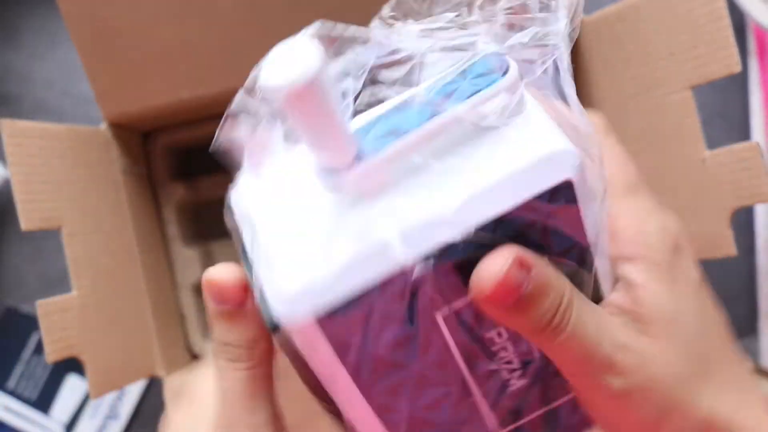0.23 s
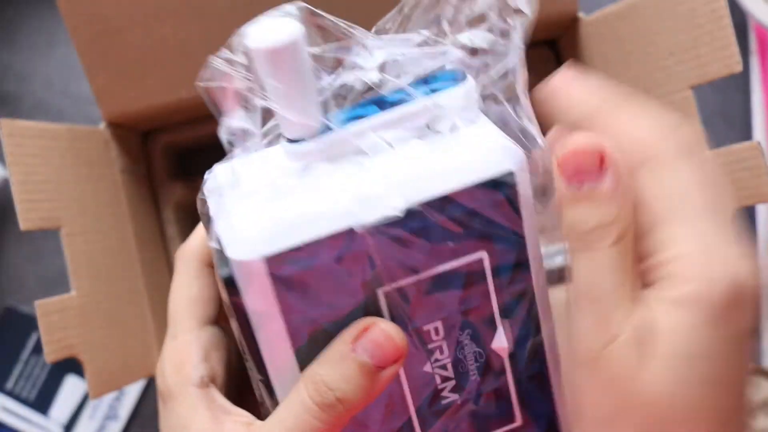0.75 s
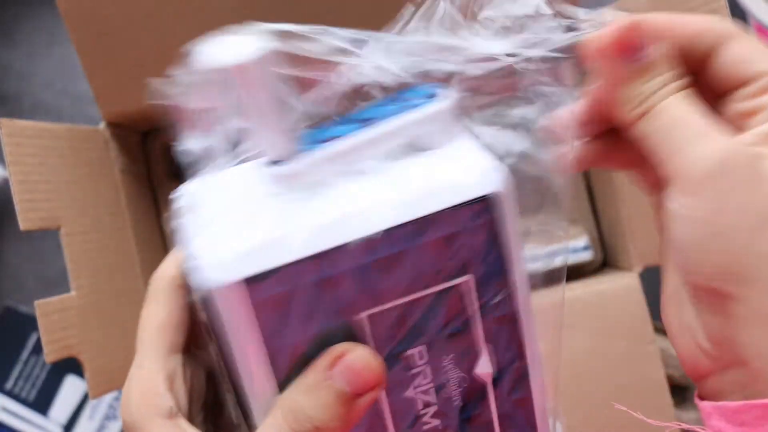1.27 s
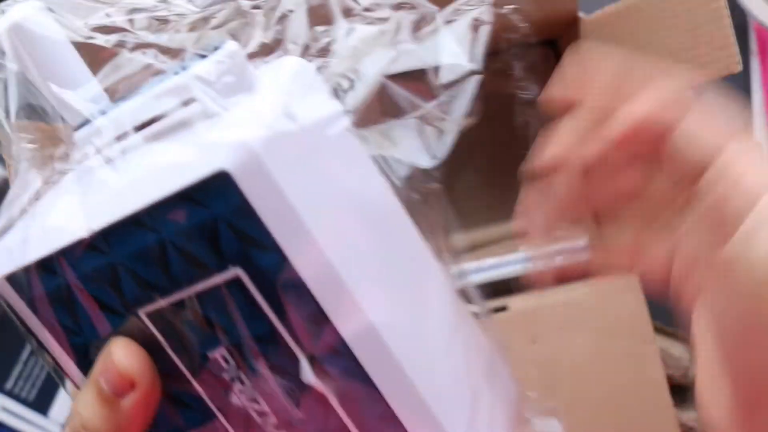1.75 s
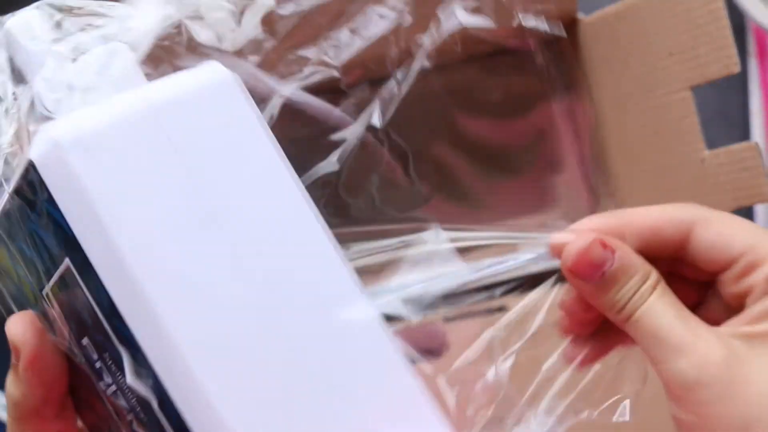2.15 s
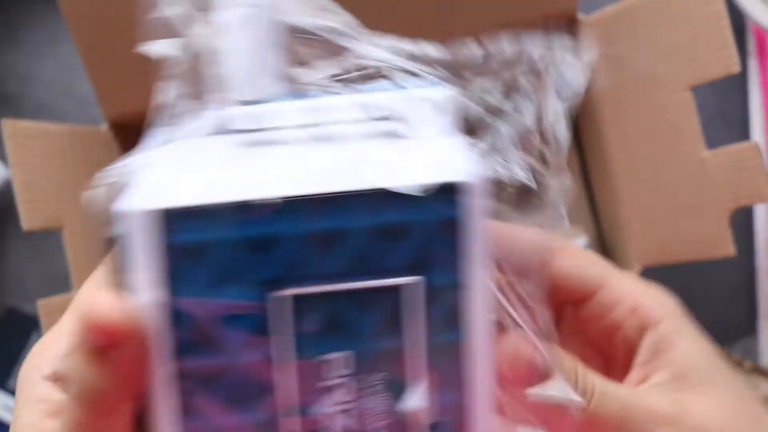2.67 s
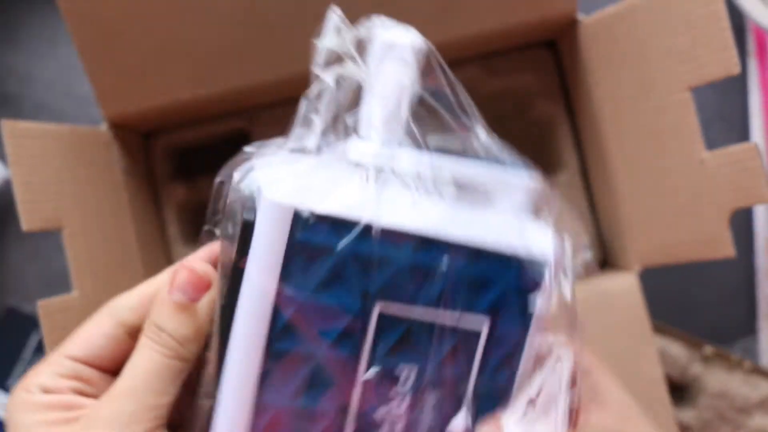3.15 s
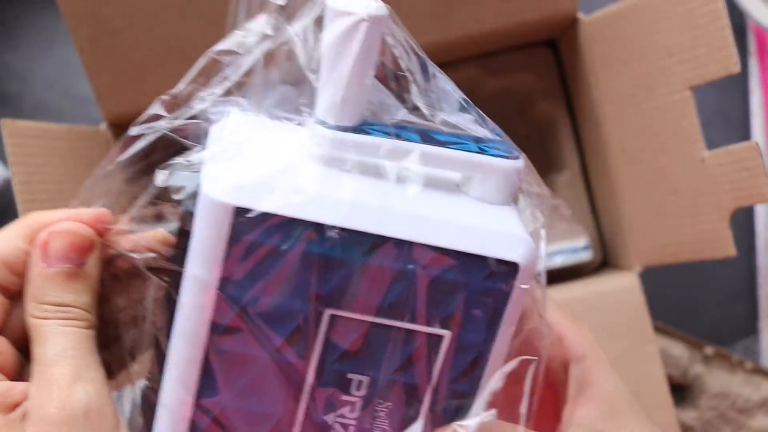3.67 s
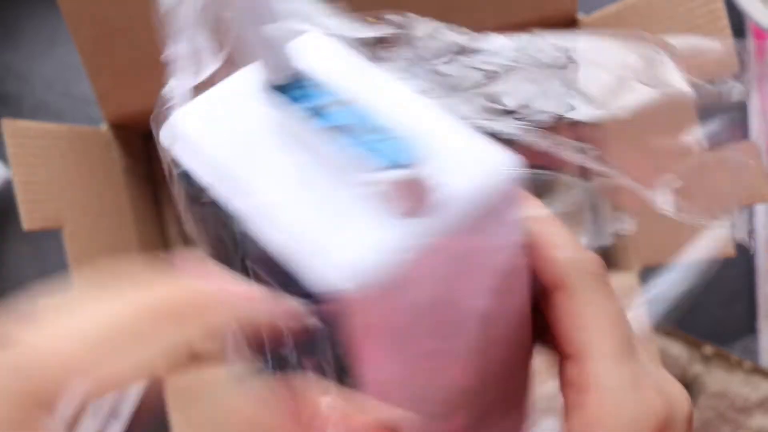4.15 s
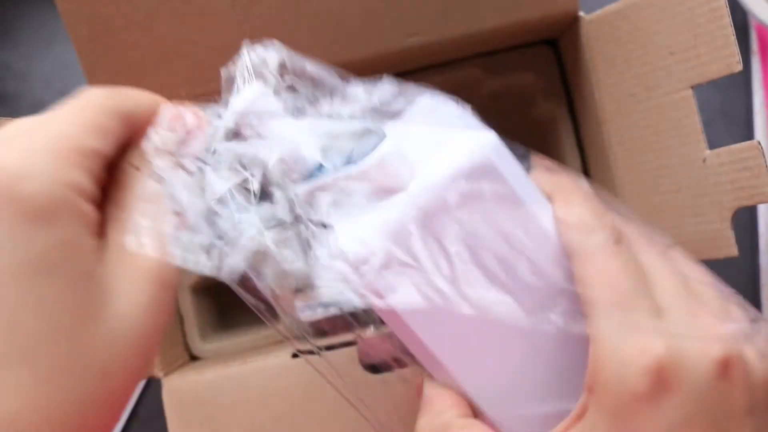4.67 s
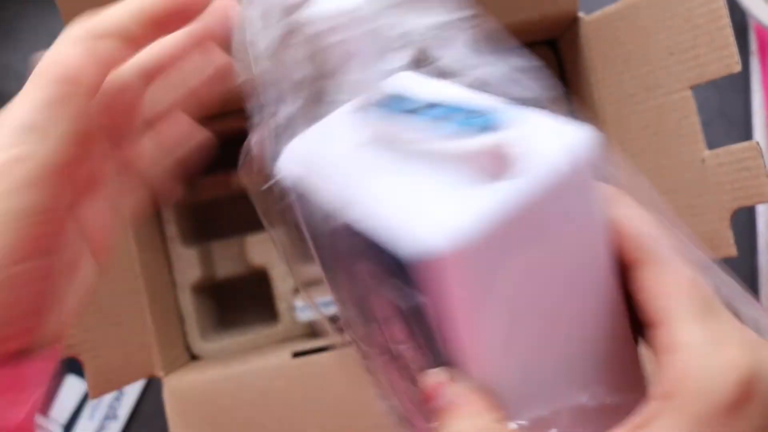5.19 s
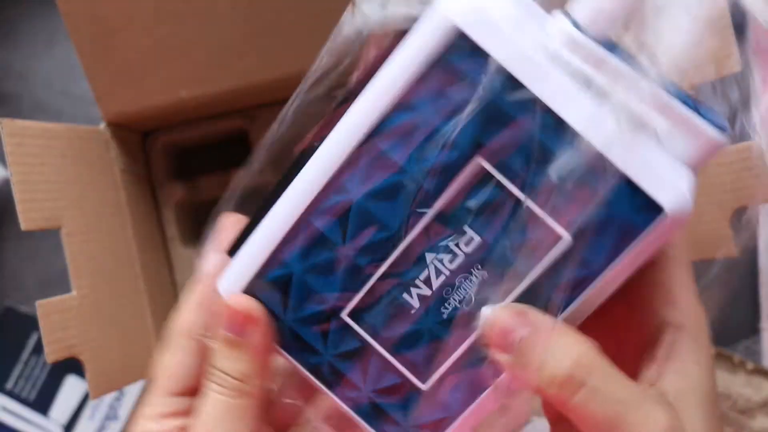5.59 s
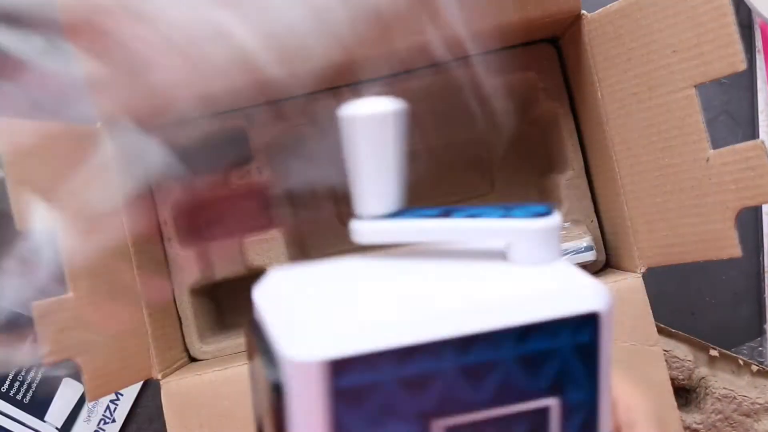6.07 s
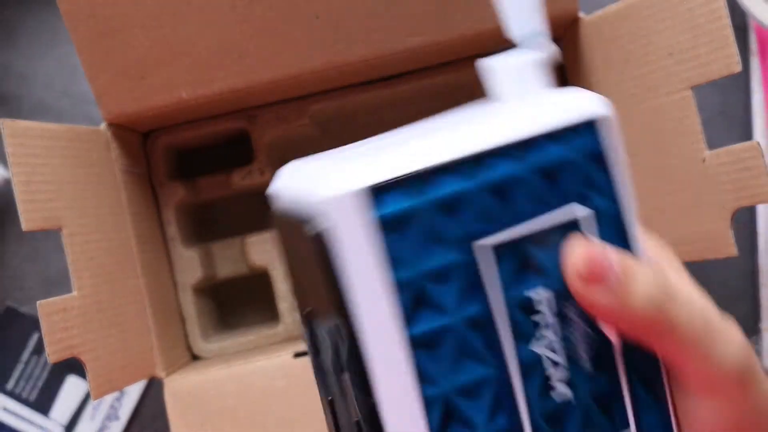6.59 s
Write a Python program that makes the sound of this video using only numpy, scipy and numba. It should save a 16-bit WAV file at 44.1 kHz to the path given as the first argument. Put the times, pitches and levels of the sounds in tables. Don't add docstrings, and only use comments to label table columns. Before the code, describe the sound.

Very close, bright plastic crinkling in a small indoor room. Tiny dry crackles run throughout in uneven surges, with hard pops and snaps on top and occasional low hollow knocks as hands turn the wrapped plastic case. Short reflections come off the carton flaps, with faint handling rumble below. Activity eases in the last second.

```python
import sys
import numpy as np
from scipy import signal
from scipy.fft import rfft, irfft, next_fast_len
from scipy.io import wavfile
from scipy.ndimage import uniform_filter1d
from numba import njit

SR = 44100
rng = np.random.default_rng(int(sys.argv[2]) if len(sys.argv) > 2 else 0)


def generate_wav(sig):
    pcm = np.round(np.clip(np.atleast_2d(sig).T, -1, 1) * 32767).astype(np.int16)
    wavfile.write(sys.argv[1], SR, pcm)


def invert_db(level):
    return 10 ** (np.asarray(level, dtype=float) / 20)


N = 301325

# (time [s], facet crackle level [dB], wide folds re facets [dB], fine ridges re facets [dB])
HAND_EFFORT = [(0.0, -31, -2, -2), (0.02, -31, -2.5, 0), (0.32, -38.5, 3.5, 2), (0.36, -46.5, -22, -11),
               (0.42, -26.5, 5, -3.5), (0.44, -37.5, -5, -2), (0.68, -28.5, 4.5, -1), (0.74, -38.5, 5, -4),
               (0.84, -39.5, 0, 12), (0.91, -44.5, -14, -16), (1.01, -26, 0.5, -0.5), (1.23, -29, -2, -7.5),
               (1.27, -35.5, -19, -2), (1.33, -28.5, 3.5, -4), (1.52, -26, 2.5, -6.5),
               (1.56, -39.5, 1.5, -7), (1.71, -27, 0, -1), (1.82, -49.5, -10, -7), (1.84, -46, 15, 3),
               (1.92, -45, -12, -12), (1.94, -36, 10.5, 4), (2.0, -34.5, 0, -3), (2.09, -31, 12.5, 6.5),
               (2.19, -34, -0.5, -17), (2.36, -39, 9.5, -1.5), (2.43, -50, 5, -9.5), (2.61, -37, 6, 4.5),
               (2.7, -38, -1, -10.5), (2.76, -28.5, -0.5, 2.5), (2.95, -34.5, -8, -4),
               (3.35, -29.5, -3.5, -4), (3.69, -35, -9, -1.5), (3.75, -50.5, -1, -30),
               (3.82, -26, -3.5, -2.5), (3.99, -34, -0.5, -8.5), (4.07, -26.5, 4, 4.5),
               (4.11, -40.5, -2, -4), (4.32, -41.5, 3, -9), (4.34, -36.5, 7.5, 1.5), (4.47, -33, -8, -9),
               (4.62, -27, 1.5, 3.5), (4.73, -27.5, -4, -11), (4.94, -25, -2, -3), (5.02, -34.5, -10, -8),
               (5.08, -32, -7, 0.5), (5.14, -39, -11, -8), (5.19, -28, -3, -3.5), (5.4, -35, -7, -18),
               (5.54, -30.5, -1, 3), (5.57, -38.5, -10, -8), (5.71, -24, 2, -2), (5.86, -34.5, -11, -5.5),
               (5.88, -26, 0.5, -1), (6.13, -31.5, 4, -5.5), (6.18, -41.5, 6.5, -10), (6.39, -40, -11, -5),
               (6.56, -34, 8.5, -4), (6.66, -51, 4, -4), (6.72, -39, 6.5, -7), (6.83, -50.5, 10, -3)]
# (time [s], peak level [dB], facet pitch [Hz], ridge tick re peak [dB])
LARGE_SNAPS = [(0.1541, -30, 5380.0, -8.0), (0.1832, -12, 5040.0, 1.0), (0.2059, -11, 4450, -15),
               (0.215, -15, 5300.0, 0.0), (0.2412, -10, 4080, 0), (0.281, -23.0, 2650.0, -12.0),
               (0.2967, -16.5, 4930, 6), (0.3164, -14, 5250.0, -9.0), (0.3525, -25, 1720.0, -11.0),
               (0.3698, -29.0, 5040.0, -4.0), (0.3793, -26.0, 6480.0, -1.0), (0.3964, -27, 1770.0, -20.0),
               (0.4801, -19, 5320.0, -6.0), (0.5076, -24, 2610.0, -6.0), (0.5254, -15.5, 5170.0, 7),
               (0.5656, -17.0, 2450.0, -10.0), (0.5719, -10.0, 4340, -21.0), (0.5844, -8, 4390.0, -12.0),
               (0.6164, -13, 2430.0, -14.0), (0.6283, -17, 1720.0, -3.0), (0.6739, -17, 2300.0, -17.0),
               (0.6852, -11, 2430.0, -11), (0.6955, -12, 3480, 11), (0.7521, -24, 5490.0, -12.0),
               (0.7823, -11, 2650.0, -4), (0.8117, -16, 2430.0, -10.0), (0.8285, -12, 3320.0, -4),
               (0.8621, -13, 4350, -15.0), (0.8894, -32, 6630.0, -4.0), (0.9124, -28, 1620, -20.0),
               (0.9382, -29, 3080.0, -6.0), (0.9517, -20.5, 2610.0, -12.0), (0.9874, -9, 2290, -6.0),
               (1.0465, -13, 2580.0, -13.0), (1.0843, -8, 2540.0, -14.0), (1.1235, -14, 2110.0, -20.0),
               (1.1843, -11, 2650.0, -6), (1.2136, -12, 2520.0, -16.0), (1.2447, -6.5, 2480.0, -22.0),
               (1.3276, -10, 2480.0, -11.0), (1.3367, -13, 2430.0, -19.0), (1.3469, -1.5, 2180, -10),
               (1.459, -16.0, 2000.0, -7.0), (1.4693, -10, 2450.0, -7), (1.4971, -7.0, 1920.0, -16.0),
               (1.589, -25.0, 1810.0, -5), (1.6103, -22, 1890.0, -8), (1.638, -21, 1770.0, -16.0),
               (1.7687, -13.5, 1960, -12.0), (1.7896, -24, 2540.0, -15.0), (1.8386, -19, 2520.0, -22.0),
               (1.8563, -35, 2860.0, -8.0), (1.8798, -15, 2520.0, -14), (1.933, -23.0, 1210.0, -16.0),
               (1.9503, -7.5, 2490, -21), (1.9748, -15, 6200.0, -4.0), (1.9999, -19, 3450.0, -4.0),
               (2.0121, -19.0, 3750.0, -9.0), (2.0211, -11, 2450.0, -12.0), (2.0505, -19, 2370.0, -13),
               (2.0733, -3.0, 2170, -18), (2.088, -5.5, 1850, -7.0), (2.1036, -3.5, 2910.0, -19.0),
               (2.1097, -6, 2540, -12.0), (2.2256, -28, 2540.0, -23.0), (2.2418, -21, 2220.0, -8.0),
               (2.2979, -12.5, 2910.0, -3), (2.3355, -23, 1210.0, -18.0), (2.3541, -18, 1770.0, -7.0),
               (2.3928, -20, 4800.0, -12.0), (2.4395, -35.0, 2000.0, -28.0), (2.4474, -36, 2780.0, -12.0),
               (2.4556, -31.0, 4180.0, 2), (2.4876, -34, 1930, -17.0), (2.5224, -30.0, 2090.0, -12.0),
               (2.5473, -21, 4290.0, -13.0), (2.558, -15, 4760, -9.0), (2.5781, -35, 1790.0, -1),
               (2.5976, -15, 1610.0, -17.0), (2.6072, -18, 1900, -2.0), (2.6227, -13, 3140, -10),
               (2.6359, -11.5, 4960, -9.0), (2.6558, -16, 3220, 2), (2.7156, -18, 2110.0, -8.0),
               (2.7313, -10, 5250.0, -6.0), (2.7435, -27, 2500.0, -6.0), (2.7502, -21, 2860.0, -16.0),
               (2.7553, -9, 5530.0, -4.0), (2.8016, -4, 2800.0, -15.0), (2.8139, -5.5, 2760.0, -22.0),
               (2.8515, -27, 2970.0, -0.0), (2.8913, -14, 1840, -1), (2.9195, -26, 2690.0, -9),
               (2.9441, -18, 5660.0, -3.0), (2.9533, -19, 1980.0, -19.0), (3.0002, -22, 2090.0, -15.0),
               (3.0439, -16, 3470.0, -7.0), (3.1058, -5, 1680.0, -3.0), (3.1811, -14, 2840.0, -9.0),
               (3.1961, -12.0, 1850.0, -12.0), (3.2085, -10.5, 5530.0, -11), (3.2248, -13, 5430.0, -14.0),
               (3.2416, -13, 2520.0, -15.0), (3.2534, -7.5, 1200, -9), (3.2966, -26, 2780.0, -6.0),
               (3.3175, -23, 1870.0, -9.0), (3.3451, -16.0, 5880.0, -7.0), (3.3733, -20.0, 1590.0, -18.0),
               (3.391, -7, 5860.0, -13.0),
               (3.4059, -2, 5730.0, -11.0), (3.4364, -8, 1920.0, -8), (3.4773, -17, 5320.0, -5.0),
              (3.4973, -9.5, 1690, -12.0), (3.555, -22, 3340.0, -8.0), (3.5702, -19.0, 3080.0, -9.0),
              (3.6455, -18.0, 1670, -8.0), (3.6686, -15.5, 1200, -6), (3.693, -21, 1770.0, -11.0),
              (3.745, -33.0, 2430.0, -19.0), (3.7567, -17.5, 1680, -26.0), (3.781, -22.0, 2300.0, -15.0),
              (3.7928, -12, 1880, -34.0), (3.807, -17, 1590.0, -15.0), (3.823, -7.5, 1850.0, -17.0),
              (3.8577, -13, 1790.0, -21.0), (3.8653, -5, 5500, -14.0), (3.9161, -9, 3470.0, -12.0),
              (3.9395, -12, 5040.0, -7.0), (3.959, -24, 4930.0, -14.0), (3.9776, -21.0, 4090.0, 5),
              (4.0223, -12, 1850.0, -10.0), (4.05, -6, 5050, -9.0), (4.111, -25, 2000.0, -14.0),
              (4.121, -19, 5190.0, 0), (4.1527, -11, 1910, -16.0), (4.2177, -16, 2640, -23.0),
              (4.2567, -12, 3470.0, -10.0), (4.316, -28, 2910.0, -28.0), (4.3346, -11.5, 3620, -7.0),
              (4.3673, -25, 2930.0, -10), (4.3771, -23, 4820.0, -16.0), (4.3954, -27, 3770.0, -18.0),
              (4.4052, -15, 5170.0, 7), (4.4327, -14, 5320.0, -12.0), (4.4637, -25, 1290.0, -10.0),
              (4.4949, -26, 1920.0, -11.0), (4.522, -7, 5340.0, -5.0), (4.5714, -19, 3700.0, -9),
              (4.581, -11.5, 2170.0, -14.0), (4.6254, -11, 3250.0, -8), (4.6346, -6.0, 3330, -15),
              (4.7461, -6, 1810.0, -17.0), (4.813, -9.0, 1790.0, -11), (4.8273, -14, 2370.0, -14.0),
              (4.9028, -7.5, 1960.0, -7.0), (4.9424, -13, 1870.0, -13.0), (5.0313, -23, 3530.0, -10.0),
              (5.0685, -16.5, 2200.0, -5.0), (5.1564, -15, 2090.0, -8), (5.1856, -14, 4690.0, -9.0),
              (5.2217, -13, 2350.0, -11.0), (5.252, -13.5, 1700, 0), (5.3167, -26, 4950.0, 4.0),
              (5.3316, -17, 1680.0, -11.0), (5.3626, -15, 1700.0, -10.0), (5.3917, -20, 1700.0, -11),
              (5.4341, -17, 1740.0, -20.0), (5.4543, -12, 6010.0, -10.0), (5.4612, -6.5, 1640, -17.0),
              (5.5413, -14, 4760, -12), (5.5966, -19, 1250.0, -10), (5.6458, -10, 2520.0, -20.0),
              (5.676, -6, 5020.0, -4.0), (5.744, -18, 3810.0, -16.0), (5.835, -6.5, 2440, -9.0),
              (5.895, -15, 2750, -7), (5.9172, -21, 3640.0, -7.0), (5.9992, -11.5, 2370, -11.0),
              (6.0373, -21, 1380.0, -11), (6.0647, -9.5, 3030, -15), (6.1644, -17.5, 1850.0, -25.0),
              (6.2067, -26, 4050.0, -14.0), (6.283, -19, 3360, -13.0), (6.296, -31, 3640.0, 4),
              (6.314, -22.0, 1570.0, -18.0), (6.328, -19, 2710.0, -14), (6.3451, -25, 1660.0, -27.0),
              (6.3985, -20.0, 3750.0, -13.0), (6.4242, -14.5, 1720, -12), (6.47, -18, 3360.0, 6),
              (6.5167, -20, 3360.0, -23.0), (6.559, -16, 1230.0, -11.0), (6.586, -13, 3600, -15),
              (6.6761, -32, 1210.0, -15.0), (6.6955, -22, 1220, -7), (6.7104, -13.5, 3940.0, -10.0),
              (6.7192, -16, 2560.0, -18.0), (6.7867, -32, 3230.0, -5)]
# (time [s], peak level [dB], pitch [Hz])
CASE_KNOCKS = [(0.229, -13.5, 775), (0.403, -14.5, 519), (0.678, -24, 288), (1.322, -14.5, 286),
               (1.379, -5, 619), (1.56, -17, 283), (1.675, -22, 364), (1.832, -20, 840), (1.942, -21, 280),
               (2.068, -6, 810), (2.354, -12, 285), (2.751, -30, 596), (2.885, -12.5, 269),
               (3.14, -14.5, 600), (3.185, -13.5, 870), (3.246, -9, 840), (3.372, -7.5, 540),
               (3.816, -11, 860), (3.917, -13, 386), (4.145, -22, 500), (4.503, -18.5, 604),
               (4.896, -5, 860), (5.455, -9.5, 285), (5.861, -19, 404)]
# (frequency [Hz], width [Hz], level [dB])
CASE_MODES = [(285, 31, 7), (606, 33, -1), (943, 41, 7), (1710, 260, -7), (2520, 205, -6)]
# (frequency [Hz], level [dB])
MIC_RESPONSE = [(30, -33), (100, -15.5), (200, -10), (400, -1), (1200, 1), (3000, 4.5), (7000, 8),
                (11000, 4.5), (16000, -2)]
# (frequency [Hz], side re mid [dB])
PORT_DIFFERENCE = [(40, -3), (200, -20), (700, -29.5), (1400, -20.5), (2800, -7), (5500, -5.5), (14000, -7)]
# (lowest pitch [Hz], highest pitch [Hz], ring [cycles], level [dB])
WIDE_FOLD = (191, 1313, 2.1, 0.5)
FLAT_FACET = (1311, 5508, 1.6, 2.5)
SHARP_RIDGE = (5497, 16000, 0.62, 1.5)
CREASES = 9000


@njit
def grains(start, pole, size):
    out = np.zeros((2, N))
    for k in range(len(start)):
        z, i = 1 + 0j, start[k]
        while abs(z) > .003 and i < N:
            out[0, i] += (size[0, k] * z).imag
            out[1, i] += (size[1, k] * z).imag
            z, i = z * pole[k], i + 1
    return out


def ring(s, hz, cycles, db, aside):
    hz = np.clip(hz, 60, .45 * SR)
    pole = np.exp((2j * np.pi - np.log(10) / cycles) * hz / SR)
    start = np.clip(s * SR, 0, N - 1).astype(np.int64)
    ports = np.array([np.ones(len(s)) + 0j, aside])
    return grains(start, pole, invert_db(db) * ports)


def unit(x):
    return x / np.sqrt(np.mean(np.square(x[0])))


def colour(x, points):
    hz, db = np.transpose(points)
    n = next_fast_len(N + 4096)
    f = np.arange(n // 2 + 1) * SR / n + 1
    gain = invert_db(np.interp(np.log(f), np.log(hz), db))
    return irfft(rfft(x, n) * gain, n)[..., :N]


def walk(rate):
    hold = int(SR / rate)
    levels = np.repeat(rng.standard_normal(N // hold + 1), hold)
    return uniform_filter1d(levels, hold // 2)[:N]


def direction(u):
    return np.exp(2j * np.pi * u)


def air(db=-105.0, rumble_db=-44.5):
    hush, rumble = rng.standard_normal((2, 2, N))
    hush = unit(colour(hush, [(100, 54), (1000, 46), (16000, -78)]))
    rumble = unit(colour(rumble, [(40, 16), (150, 3), (400, -35), (20000, -68)]))
    rumble = rumble * invert_db(4.0 * walk(13))
    return invert_db(db) * hush + invert_db(rumble_db) * rumble


def space(x, flaps_db=-6.0, flaps_s=0.0037, room_db=-17.5, room_t60_s=0.1, size=1024):
    t = np.arange(7 * size) / SR
    flaps = unit([np.exp(-t / flaps_s) * (t > .0006)])
    room = unit([1000. ** (-t / room_t60_s) * np.minimum(t / 0.0029, 1)])
    shape = invert_db(flaps_db) * flaps + invert_db(room_db) * room
    blocks = np.pad(x, ((0, 0), (0, -N % size))).reshape(2, -1, size)
    answers = rng.standard_normal((2, blocks.shape[1], len(t))) * shape / np.sqrt(len(t))
    echoes = irfft(rfft(blocks, 8 * size) * rfft(answers, 8 * size))
    wet = 0
    for k in range(8):
        part = echoes[..., k * size:(k + 1) * size].reshape(2, -1)
        wet = wet + np.pad(part, ((0, 0), (k * size, 0)))[:, :N]
    return x + wet


def body(x, share_db=-4.5):
    rung = 0
    for hz, width, db in CASE_MODES:
        rung = rung + invert_db(db) * signal.lfilter(*signal.iirpeak(hz, hz / width, SR), x)
    return x + invert_db(share_db) * rung


def thuds(gain_db=-5.0, cycles=4.9):
    s, db, hz = np.transpose(CASE_KNOCKS)
    return ring(s, hz, cycles, db + gain_db, direction(rng.random(len(s))))


def crackle(spread_db=5.5, burst_db=3.0, own_db=2.0):
    u = rng.random((CREASES, 9)).T
    s = u[0] * N / SR
    t, facet_db, fold_db, ridge_db = np.transpose(HAND_EFFORT)
    burst = burst_db * walk(45)[(u[0] * N).astype(int)]
    size_db = spread_db * 2 * u[1] ** 2 + burst
    kinds = [(WIDE_FOLD, fold_db), (FLAT_FACET, 0), (SHARP_RIDGE, ridge_db)]
    out = 0
    for k, ((lo, hi, cycles, db), rel_db) in enumerate(kinds):
        hz = lo * (hi / lo) ** u[2 + k]
        own = size_db + own_db * 2 * (2 * u[5 + k] - 1) + 5 * np.log10(hz / lo)
        layer = unit(ring(s, hz, cycles, own, direction(u[8])))
        effort_db = np.interp(np.arange(N) / SR, t, facet_db + rel_db)
        out = out + layer * invert_db(db + effort_db)
    return out


def snaps(facet_db=2.5, fold_db=-12.5, ridge_db=13.0, after_db=-8.0, after_s=.018, fade_db=-22.0, count=14):
    events = np.array(LARGE_SNAPS)
    s, db, hz, ridge = np.repeat(events, count, axis=0).T
    u = rng.random((len(s), 6)).T
    turn = np.arange(len(s)) % count
    later = turn > 0
    wait = (turn + u[0] - 1) * later / count
    at = s + after_s * wait
    now = db + later * (after_db - 3.0 * u[1]) + fade_db * wait
    aside = direction(u[2])
    facet = ring(at, hz * 4.2 ** (later * (u[3] - .5)), 2.56, now + facet_db, aside)
    fold = ring(at, 250 * 5.7 ** u[4], 2.16, now + fold_db, aside)
    tick = ring(at, 6500 + 8500 * u[5], 1.3, now + ridge + ridge_db, aside)
    return facet + fold + tick


def scene():
    film = invert_db(-3.5) * crackle() + invert_db(-1.5) * snaps()
    mid, side = space(body(film + thuds())) + air()
    side = colour(side, PORT_DIFFERENCE)
    return np.array([invert_db(-0.57) * (mid + side), mid - side])


def low_pass(x):
    return signal.sosfilt(signal.butter(12, 16690, fs=SR, output="sos"), x)


def record(dry):
    edge = signal.ellip(10, .3, 60, 15900, fs=SR, output="sos")
    heard = signal.sosfilt(edge, colour(dry, MIC_RESPONSE))
    mix = np.clip(heard, -.98, .98)
    return low_pass(mix)


dry = scene()
out = record(dry)
generate_wav(out)
```